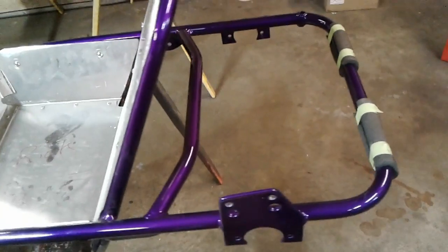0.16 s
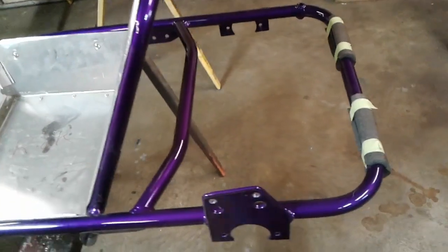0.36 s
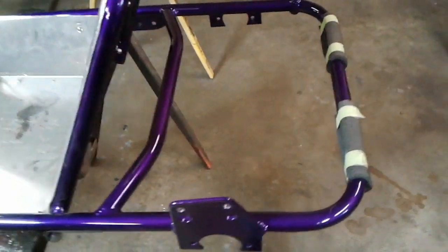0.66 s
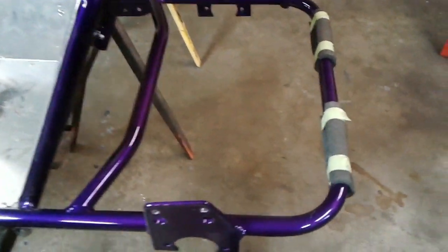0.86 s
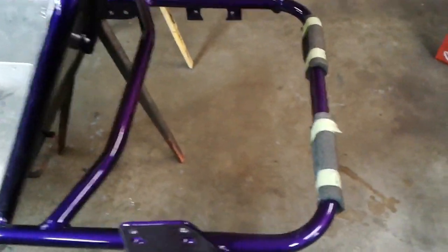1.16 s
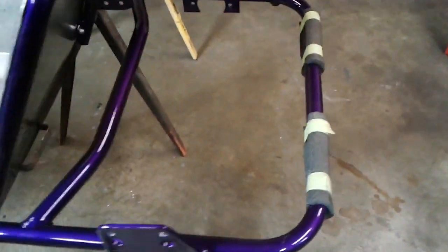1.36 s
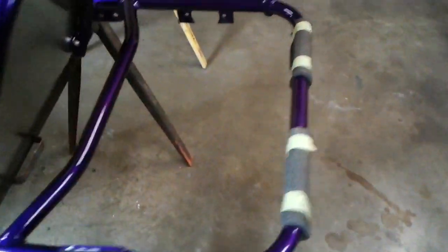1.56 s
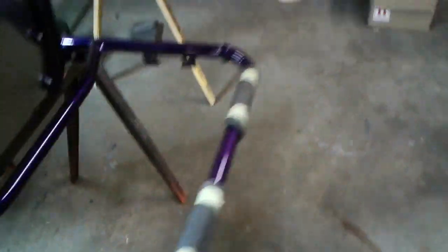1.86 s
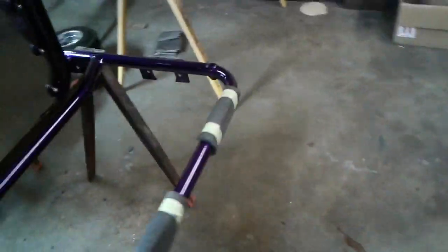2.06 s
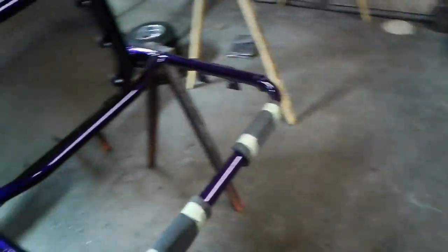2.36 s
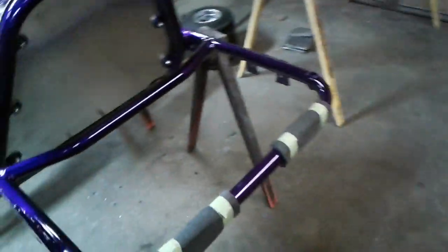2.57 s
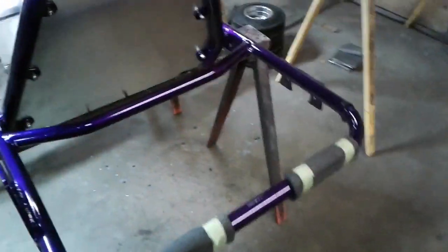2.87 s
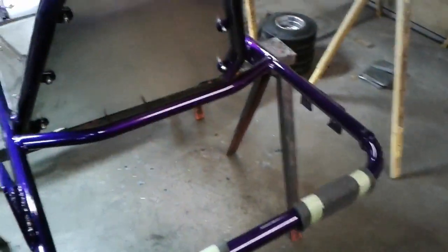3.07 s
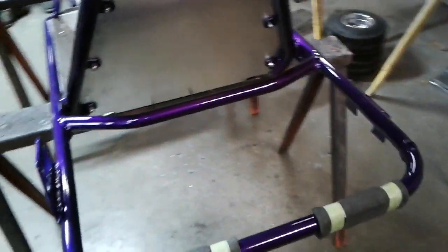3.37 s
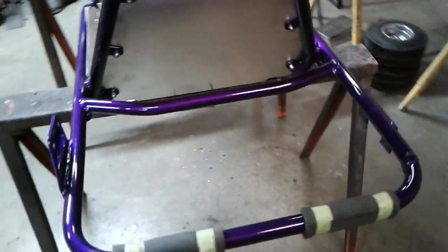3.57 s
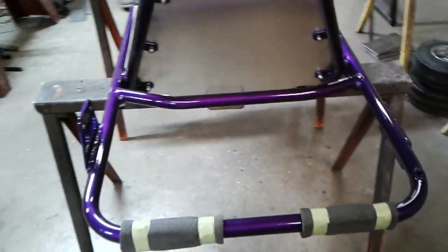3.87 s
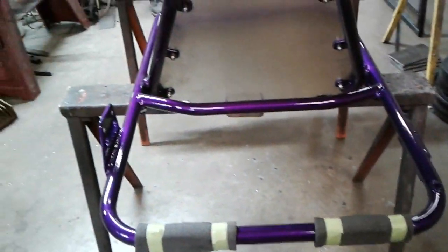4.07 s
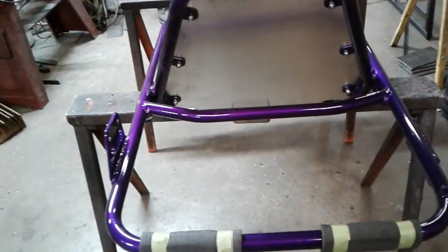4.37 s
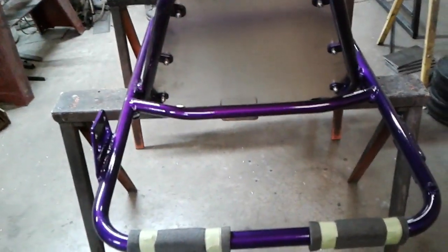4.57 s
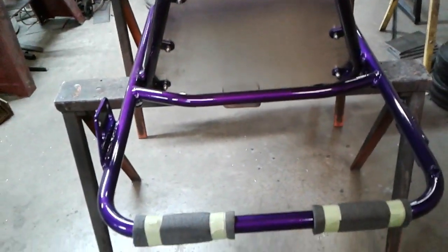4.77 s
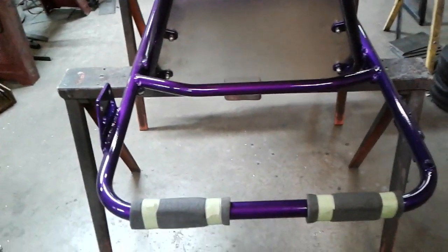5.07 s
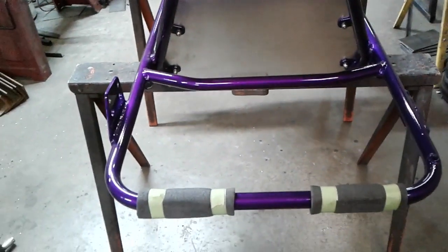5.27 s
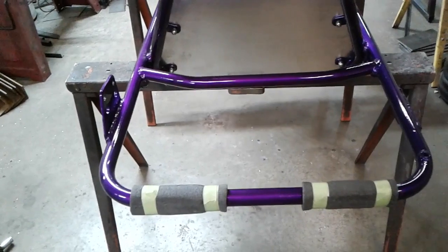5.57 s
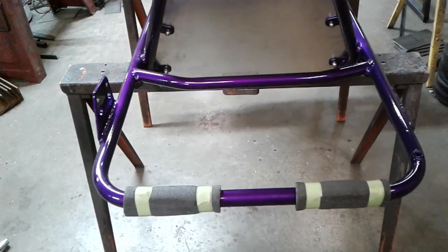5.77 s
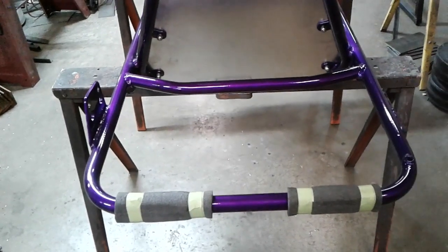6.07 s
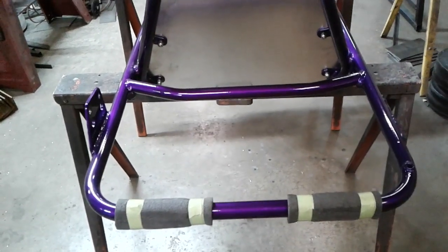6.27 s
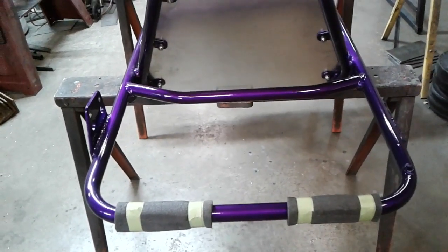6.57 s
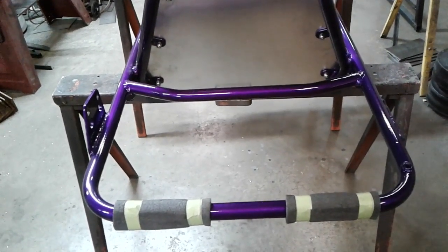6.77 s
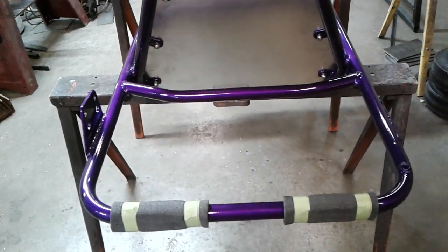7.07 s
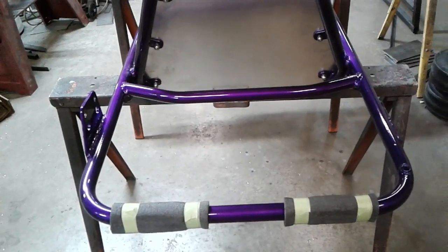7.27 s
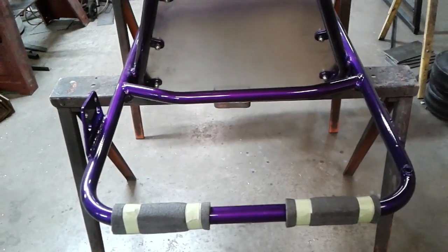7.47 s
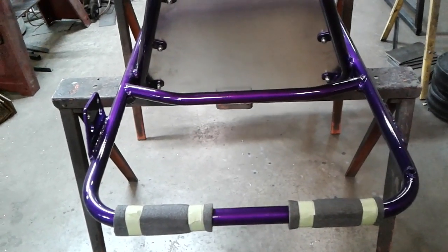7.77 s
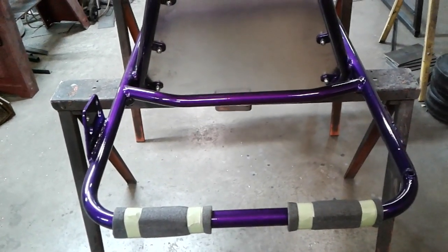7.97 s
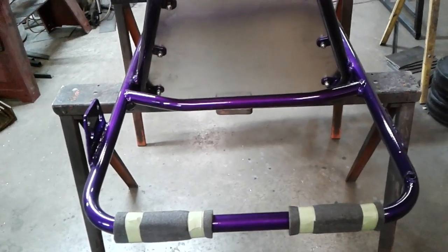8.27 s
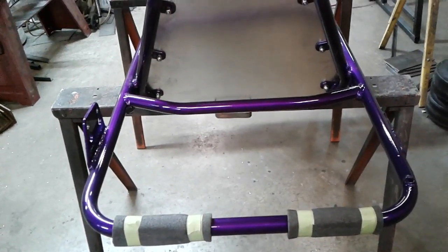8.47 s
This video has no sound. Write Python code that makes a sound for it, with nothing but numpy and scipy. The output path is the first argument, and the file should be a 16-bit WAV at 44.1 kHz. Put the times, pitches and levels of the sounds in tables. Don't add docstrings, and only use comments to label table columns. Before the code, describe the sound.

Deep mains-like hum grows louder indoors while soles scrape grit, tiny handling ticks snap and one dull thud lands near five seconds.

```python
import sys
import numpy as np
from scipy import signal
from scipy.fft import rfft, irfft, next_fast_len
from scipy.io import wavfile
from scipy.ndimage import uniform_filter1d

SR = 44100
rng = np.random.default_rng(int(sys.argv[2]) if len(sys.argv) > 2 else 0)


def boost(x):
    u = np.asarray(x, float) / 20
    return 10 ** u


def int16_out(signal):
    q = np.round(np.clip(np.atleast_2d(signal).T, -1, 1) * 32767)
    wavfile.write(sys.argv[1], SR, q.astype(np.int16))


N = 380583
T = np.arange(N) / SR

CORE_HZ, SHAFT_HZ, BUZZ_HZ, CLOCK_HZ, WHINE_HZ = 119.99, 29.955, 60.42, 1000, 1340.5
BELT_HZ, HUNT_HZ = 11.6, 12
LOUD_ORDER = 36
SOUND_M_PER_S = 343
AIR_DB, ROOM_RIPPLE_DB = -42.5, 2.4
SCUFF_DROP_DB, SCUFF_ROUND = 14, 1.52
FLUTTER_DB = 1.8
FINE_DB, DUST_DB, DUST_FOLLOWS = -12, -5.5, 1.3
LONG_DRAG_S = 0.17
SHORT_END, LONG_END = 1, 1.08

# time in seconds, share of the way from first to last standpoint (0-1).
WALK_SHARE = [(0, 0.5), (.7, 0), (1.3, 0.1), (2, 0.8), (2.7, 0.5), (3.5, 0.94), (4.5, 1), (6, 0.9),
              (8.63, 0.85)]
# time in seconds, standpoint number (0-7).
STANDPOINT_PATH = [(.7, 0), (1, 1), (1.4, 1), (2, 2), (2.8, 3), (3.65, 4), (4.5, 5), (5.5, 6), (6.3, 7),
                   (8.63, 7)]
# time in seconds, distance from a still point of the hum in metres.
WAVE_PATH = [(0, .008), (.3, .02), (.5, .032), (.9, .076), (1.3, .118), (1.7, .165), (2.1, .215),
             (2.5, .25), (2.9, .3), (3.3, .36), (3.7, .4), (4.1, .49), (4.3, .44), (4.9, .48), (5.7, .43),
             (6.6, .495), (8.15, .45), (8.63, .5)]

# level at the wave's loudest spot in dB, level of the scattered sound in dB.
CORE_LEVELS = (-23.3, -62)
# time in seconds, 2nd harmonic in dB, 3rd harmonic in dB.
CORE_OVERTONES = [(0, -44, -48), (.2, -42.5, -47), (.45, -46, -49), (.85, -43, -46.5), (1.15, -48, -47),
                  (1.4, -45, -44.5), (1.7, -49, -40.5), (2, -56, -38), (2.2, -56, -38.5), (2.5, -55, -42.5),
                  (2.75, -54, -40), (3.15, -53, -40.5), (3.6, -49, -39), (3.9, -46, -42),
                  (4.9, -45.5, -39.5), (5.2, -45.5, -41), (6.2, -45.5, -40.5), (8.63, -46, -42)]
# multiple of the shaft speed, then level in dB at each of eight standpoints.
SHAFT_ORDERS = [(5, -59, -54, -57, -57, -62, -68, -66, -65), (9, -56, -56, -56, -51, -49, -52, -50, -50),
                (10, -53, -55, -61, -56, -56, -56, -57, -58), (13, -68, -61, -60, -56, -54, -52, -53, -55),
                (14, -56, -48, -53, -55, -52, -52, -55, -54), (16, -52, -51, -51, -72, -56, -58, -55, -55),
                (17, -53, -60, -58, -55, -52, -57, -54, -51), (19, -68, -69, -65, -59, -57, -61, -61, -60),
                (20, -58, -60, -71, -55, -53, -53, -55, -55), (24, -57, -56, -57, -58, -60, -59, -58, -61),
                (28, -77, -67, -68, -64, -59, -61, -59, -58), (32, -65, -68, -67, -71, -66, -75, -70, -69)]
# multiple of its speed, then level in dB at each of eight standpoints.
BUZZ_ORDERS = [(26, -66, -78, -68, -67, -72, -71, -69, -63), (27, -68, -66, -68, -69, -66, -62, -62, -63),
               (28, -62, -71, -72, -73, -72, -71, -69, -73), (30, -65, -79, -70, -75, -72, -77, -74, -68),
               (31, -75, -72, -65, -73, -65, -65, -64, -68), (32, -69, -64, -75, -70, -61, -67, -67, -61),
               (33, -70, -67, -61, -57, -62, -64, -63, -63), (34, -57, -66, -68, -70, -66, -62, -58, -61),
               (35, -71, -76, -64, -60, -60, -60, -60, -63), (37, -77, -78, -66, -62, -59, -63, -65, -65),
               (38, -63, -60, -77, -65, -63, -69, -72, -76)]
# multiple of its speed, then level in dB at each of eight standpoints.
HIGH_BUZZ_ORDERS = [(54, -78, -78, -73, -71, -69, -77, -78, -73),
                    (56, -72, -71, -70, -80, -72, -80, -68, -71),
                    (58, -70, -72, -72, -71, -76, -69, -72, -73),
                    (60, -78, -67, -71, -66, -75, -69, -73, -76),
                    (64, -76, -75, -72, -70, -66, -77, -76, -79),
                    (66, -72, -69, -71, -76, -69, -72, -71, -71),
                    (68, -71, -65, -68, -71, -67, -72, -71, -71),
                    (70, -65, -66, -72, -67, -63, -73, -73, -68),
                    (72, -69, -70, -70, -70, -65, -71, -68, -69),
                    (74, -70, -75, -75, -70, -73, -73, -75, -70),
                    (76, -75, -77, -75, -75, -72, -69, -74, -73),
                    (92, -86, -88, -80, -87, -77, -81, -83, -84)]
# time in seconds, level in dB.
BUZZ_TURNING = [(0, -1), (.7, 0), (1, -1), (2.4, -1), (2.65, -3), (2.9, -1), (8.63, -1)]
# time in seconds, level in dB.
LOUD_BUZZ_FADES = [(0, -51), (.25, -53), (.45, -59), (.65, -54), (.9, -65), (1.7, -71), (1.9, -59),
                   (2.3, -57), (2.7, -69), (3.5, -63), (3.9, -57), (4.25, -65), (4.85, -55), (5.3, -67),
                   (5.9, -58), (7.2, -67), (7.7, -58), (8.1, -63), (8.63, -57)]
# pitch in Hz,
# then level in dB at each of eight standpoints.
PANEL_TONES = [(161, -56, -54, -52, -55, -55, -58, -62, -58),
               (180.2, -67, -59, -55, -53, -56, -55, -52, -53),
               (228, -66, -70, -64, -55, -56, -58, -58, -59),
               (330.5, -56, -54, -55, -56, -58, -54, -57, -57),
               (450.5, -53, -64, -57, -58, -58, -61, -62, -62),
               (540, -75, -70, -66, -74, -72, -73, -73, -65), (592, -68, -74, -63, -57, -56, -56, -59, -59),
               (660, -67, -66, -73, -65, -68, -66, -69, -70), (690, -74, -69, -76, -67, -78, -68, -67, -67),
               (797, -68, -77, -68, -72, -70, -73, -64, -62), (622, -70, -70, -68, -68, -67, -66, -64, -64),
               (866, -63, -70, -70, -66, -63, -62, -64, -66), (967, -66, -69, -68, -72, -68, -74, -70, -67),
               (1259, -76, -76, -74, -72, -72, -70, -68, -67),
               (1510, -74, -74, -72, -70, -70, -68, -66, -70),
               (2356, -78, -78, -76, -74, -74, -74, -72, -73),
               (5666, -88, -94, -93, -87, -91, -87, -79, -79)]
# time in seconds, level in dB.
WHINE_FADES = [(0, -74), (.5, -74), (.7, -63), (1.5, -62), (1.7, -56), (1.95, -59), (2.3, -54.5),
               (2.5, -57), (2.7, -68), (3.1, -55), (3.35, -55.5), (3.6, -60), (4.1, -54.5), (5.3, -53),
               (6.3, -55.5), (7.5, -53.5), (8.3, -54), (8.63, -57)]
# frequency in Hz, level in dB per Hz at the first standpoint, at the last.
AIR_SPECTRUM = [(19.8, -27.5, -30), (45, -20, -15.5), (63.7, -17, -22), (98, 0, 1), (171, -0.5, -2),
                (250, -6, -1), (418, -3, -4), (827, -13, -7.5), (1050, -14.5, -13), (2200, -17, -14),
                (2690, -22, -22), (4780, -35, -29), (6200, -50, -34.5), (15900, -34, -39)]

# multiple of the clock pitch, level in dB.
CLOCK_TONES = [(6, -101), (7, -100), (8, -92), (9, -86), (10, -102), (12, -120), (13, -86), (14, -91),
               (15, -100)]
# on in seconds, off in seconds.
CLOCK_TIMES = [(0, 1.5), (1.72, 2.58), (2.72, 5.8), (5.86, 5.91), (6.71, 7.52), (7.56, 7.6), (7.64, 7.67),
               (7.74, 8.01), (8.04, 8.07), (8.12, 8.15)]
# frequency in Hz, gain in dB.
MIC_RESPONSE = [(4700, 0), (5200, -4), (6000, -3), (6800, -9.5), (7800, 0), (9400, 5.5), (10000, -7),
                (10800, -11.5), (11700, -22), (12700, -16), (13500, -11), (15500, -8)]

# frequency in Hz, level in dB.
COARSE_SPECTRUM = [(700, -33.5), (1250, -7), (1600, -7), (2200, -5), (2900, -6), (3600, -6.5), (5700, -17),
                   (8000, -22.5)]
# frequency in Hz, level in dB.
FINE_SPECTRUM = [(4000, -29), (6500, -7.5), (7700, -3), (9000, -1), (11000, -12), (12500, -18.5)]
# frequency in Hz, level in dB.
DUST_SPECTRUM = [(10500, -26), (12500, -1), (14000, -7), (16000, -2.5)]
# time in seconds, effort in dB, brightness in dB.
RUSTLE_EFFORT = [(0, -55.5, 0), (.4, -55, -4.5), (.8, -61.5, 6.5), (1.3, -54, 1), (1.8, -55, -3.5),
                 (2.2, -52, -1), (2.52, -63, 10), (2.65, -65, 2), (2.74, -50, -4), (3.2, -56, 1.5),
                 (3.65, -54.5, -8), (4.05, -57, 3), (4.35, -55, 5), (4.7, -63, 9), (5.15, -59.5, 0),
                 (5.6, -71, 1), (6, -74.5, -3), (8.63, -68, -3)]
# peak time, rise and fall in seconds, peak level in dB, brightness in dB.
SCUFF_EVENTS = [(.19, .14, 0.077, -59, 10), (.65, 0.04, 0.046, -52, -9), (.96, 0.032, 0.21, -54, 1),
                (1.22, 0.11, 0.038, -51, -8), (1.42, 0.1, .08, -56, 0), (1.55, .04, .04, -61, 1),
                (2.03, 0.14, 0.17, -51, 1), (2.29, 0.11, 0.24, -46.5, 1), (3.08, 0.16, 0.21, -49, 0),
                (3.275, 0.033, 0.097, -52, 6), (3.455, 0.015, 0.05, -53, 10),
                (3.513, .025, 0.071, -43, 1.5), (3.765, 0.048, 0.21, -44, -2.5),
                (4.136, 0.0098, 0.077, -43, .6), (4.83, 0.046, 0.13, -44, 1), (4.92, 0.12, 0.13, -44, 2.5),
                (5.766, .13, .18, -55.5, -11), (6.214, 0.17, 0.17, -54.5, -5), (6.39, .02, 0.14, -59, 11),
                (6.67, 0.088, .08, -60, -2), (6.93, .08, .05, -66, 6), (7.69, .05, .04, -59, -14),
                (8.09, 0.045, .08, -68, 14), (8.35, .02, .04, -56, -5)]
# start in seconds,
# length in seconds, pitch in Hz, width in Hz, level in dB.
SOLE_RINGS = [(.63, .06, 5300, 900, -62), (3.441, .04, 9200, 500, -56), (3.443, .02, 14600, 2000, -54),
              (3.486, .075, 1880, 200, -44), (3.502, .031, 3720, 200, -51), (3.5, .05, 2430, 250, -55),
              (3.75, .11, 2270, 120, -47), (3.75, .06, 3890, 100, -52), (3.806, .12, 2470, 250, -56),
              (4.127, .047, 2010, 150, -44), (4.123, .05, 2450, 150, -42), (4.12, .079, 1710, 50, -48),
              (4.8, .07, 3360, 120, -50), (4.837, .13, 3000, 700, -51), (4.78, .2, 1640, 260, -46.5),
              (4.799, .21, 1960, 400, -45.5), (4.8, .18, 5500, 1200, -47.5), (5.698, .15, 3400, 500, -58),
              (3.49, .06, 6200, 1500, -53), (3.46, .14, 13800, 2500, -52.5), (3.71, .13, 1900, 500, -49),
              (4.12, .04, 6200, 1500, -56), (4.79, .1, 6200, 1500, -55), (4.775, .06, 1500, 400, -48),
              (3.73, .16, 5250, 400, -56), (3.78, .09, 4550, 150, -57), (3.84, .1, 2150, 120, -53),
              (6.19, .06, 5450, 350, -63), (6.36, .12, 14800, 1500, -60), (1.37, .07, 3100, 300, -56),
              (.48, .16, 720, 25, -53), (1.8, .16, 720, 25, -55), (5.72, .12, 5400, 300, -68)]

# start in seconds, peak in dB, time to fall 60 dB in seconds, lowest frequency in Hz.
JOINT_TICKS = [
    (0.188, -52, 0.005, 8000),
    (1.3136, -47, 0.005, 8000),
    (1.5519, -52, 0.005, 8000),
    (2.0256, -45, 0.005, 8000),
    (2.2238, -56, .005, 6000),
    (2.7601, -53, 0.005, 8000),
    (3.259, -44, 0.005, 8000),
    (6.3789, -56, .008, 8000),
    (3.4420, -31, 0.006, 8000),
]
# frequency in Hz, gain in dB.
TICK_RESPONSE = [(6000, -6), (8500, 3), (10500, 2), (11600, -4), (12500, -12), (13500, -3), (15000, -1),
                 (16000, -4), (16600, -20)]
# start in seconds, level in dB, pitch in Hz, time to fall 60 dB in seconds.
STEP_THUDS = [
    (1.95, -40, 60, .15),
    (3.46, -48, 49, .1),
    (4.966, -35, 190, 0.3),
    (4.998, -27, 340, 0.044),
    (4.9621, -17, 220, 0.03),
]
# time in seconds, pitch in Hz, level in dB.
RUBBER_SQUEAKS = [
    [(6.06, 9800, -90), (6.09, 10700, -84), (6.12, 11400, -92)],
    [(6.13, 12500, -93), (6.17, 12900, -86), (6.23, 13100, -90)],
    [(6.14, 13600, -90), (6.18, 14100, -84), (6.26, 14400, -90), (6.33, 13800, -86)],
    [(6.13, 14900, -86), (6.17, 15500, -81), (6.22, 15300, -90), (6.26, 15700, -76), (6.33, 15000, -83)],
]


def evened(x):
    return x / np.sqrt(np.mean(x ** 2) + 1e-20)


def read(points, hz, column=1):
    rows = np.transpose(points)
    return np.interp(np.log(hz + 1), np.log(rows[0] + 1), rows[column])


def curve(rows):
    s, *columns = np.transpose(rows)
    return [np.interp(T, s, c) for c in columns]


def drift(top_hz):
    t = T[::256]
    hz = np.geomspace(top_hz / 20, top_hz, num=16)[:, None]
    waves = np.sin(2 * np.pi * (hz * t + rng.random(hz.shape)))
    slow = (waves / np.sqrt(hz)).sum(0)
    return np.interp(T, t, evened(slow))


def coloured(x, points):
    size = next_fast_len(N)
    gain = boost(read(points, np.fft.rfftfreq(size, 1 / SR)))
    return irfft(rfft(x, size) * gain, size)[:N]


def tone(turns, db):
    return np.sqrt(2) * boost(db) * np.cos(2 * np.pi * turns)


def gated(active, samples):
    return uniform_filter1d(active, size=samples)


def core():
    crest_db, scattered_db = CORE_LEVELS
    turns = CORE_HZ * T + 0.0017 * drift(30)
    metres = curve(WAVE_PATH)[0]
    wave = boost(crest_db) * np.sin(2 * np.pi * CORE_HZ * metres / SOUND_M_PER_S)
    hum_db = 10 * np.log10(wave ** 2 + boost(2 * scattered_db))
    out = np.zeros(N)
    for k, db in enumerate([hum_db, *curve(CORE_OVERTONES)]):
        tremble_db = (0.17 + 0.11 * k) * drift(40)
        out += tone((k + 1) * turns - 0.12 * k, db + tremble_db)
    return out


def orders(rows, turns, place, fade_db, fade_hz, spread, slip, shift=0):
    out = np.zeros(N)
    for k, *standpoint_db in rows:
        phase = k * turns + shift + spread * rng.random() + slip * drift(fade_hz)
        db = np.interp(place, range(len(standpoint_db)), standpoint_db)
        out += tone(phase, db + fade_db * drift(fade_hz))
    return out


def machines():
    place = curve(STANDPOINT_PATH)[0]
    shaft_turns = SHAFT_HZ * T + 0.0007 * drift(4)
    shaft = orders(SHAFT_ORDERS, shaft_turns, place, 1.6, 20, spread=0.6, slip=0.015)

    belt = 2 * np.pi * (BELT_HZ * T + 0.12 * drift(3))
    turns = BUZZ_HZ * T + 0.0005 * drift(8)
    wobbled = turns + 0.0029 * np.sin(belt)
    buzz = orders(BUZZ_ORDERS, wobbled, place, 1.8, 16, spread=1, slip=0.03)
    hunt = np.cumsum(HUNT_HZ * np.tanh(2.5 * drift(5))) / SR
    high_turns = turns + 0.001 * np.sin(belt)
    high = boost(0.8) * orders(HIGH_BUZZ_ORDERS, high_turns, place, 2, 20, spread=1, slip=0.05, shift=hunt)
    loud_turns = LOUD_ORDER * wobbled + rng.random() + 0.03 * drift(30)
    loud = tone(loud_turns, curve(LOUD_BUZZ_FADES)[0] + 2.2 * drift(20))

    panels = orders(PANEL_TONES, T + 0.00009 * drift(14), place, 2, 24, spread=1, slip=0.045)
    whine_turns = WHINE_HZ * T + rng.random() + 0.06 * drift(30)
    whine = tone(whine_turns, curve(WHINE_FADES)[0] - 0.7 + 2 * drift(30))
    turning = boost(curve(BUZZ_TURNING)[0])
    return boost(-0.8) * shaft + turning * (buzz + high) + loud + boost(0.54) * panels + whine


def air(walk):
    frames, hz = N // 512 + 5, np.fft.rfftfreq(2048, 1 / SR)
    a, b, patches = rng.standard_normal((3, len(hz), frames))
    patches = uniform_filter1d(patches, size=16, axis=0)
    patches = evened(uniform_filter1d(patches, size=8, axis=1))
    share = np.interp(np.arange(frames) * 512, np.arange(N), walk)
    first = read(AIR_SPECTRUM, hz)[:, None]
    last = read(AIR_SPECTRUM, hz, 2)[:, None]
    z = (a + 1j * b) * boost(first + (last - first) * share + 0.94 * patches)
    noise = signal.istft(z, nperseg=2048, noverlap=1536)[1][:N]
    return boost(AIR_DB) * evened(noise)


def room(x):
    hz, t, z = signal.stft(x, SR, nperseg=8192)
    count = len(STANDPOINT_PATH)
    ripple = evened(uniform_filter1d(rng.standard_normal((len(hz), count)), size=3, axis=0))
    place = np.interp(t, *np.transpose(STANDPOINT_PATH))
    near = np.clip(1 - abs(place - np.arange(count)[:, None]), 0, 1)
    field = ripple @ (near / np.linalg.norm(near, axis=0))
    reach = 1 / (1 + (hz / 3000) ** 2) * (hz > 200)
    gain = boost(ROOM_RIPPLE_DB * reach[:, None] * (field - 0.3))
    return signal.istft(z * gain, SR, nperseg=8192)[1][:N]


def clock():
    active = sum(1. * (T >= on) * (T < off) for on, off in CLOCK_TIMES)
    whine = sum(tone(k * CLOCK_HZ * T + rng.random(), db + 1.3 * drift(20)) for k, db in CLOCK_TONES)
    return 0.92 * gated(active, 400) * whine


def rubbing(follows):
    effort_db, bright_db = curve(RUSTLE_EFFORT)
    power = boost(2 * (effort_db + follows * bright_db + FLUTTER_DB * drift(10)))
    for s, rise, fall, db, bright in SCUFF_EVENTS:
        near = slice(max(round((s - 3 * rise) * SR), 0), round((s + 3 * fall) * SR))
        away = np.maximum((s - T[near]) / rise, (T[near] - s) / fall)
        power[near] += boost(2 * (db + follows * bright - SCUFF_DROP_DB * away ** SCUFF_ROUND))
    return np.sqrt(power)


def grit(points, per_s, spread_db):
    size_db = spread_db * np.minimum(rng.exponential(1, N), 4)
    grains = boost(size_db) * rng.standard_normal(N)
    struck = rng.random(N) < per_s / SR
    return evened(coloured(grains * struck, points))


def resonate(x, hz, width):
    turn = np.exp(2j * np.pi * np.cumsum(hz) / SR)
    r = np.exp(-np.pi * width / SR)
    return 2 * (turn * signal.lfilter([1 - r], [1, -r], x / turn)).real


def scuffs():
    out = rubbing(0) * boost(1.5) * grit(COARSE_SPECTRUM, per_s=20000, spread_db=2.5)
    out += rubbing(0.97) * boost(FINE_DB) * grit(FINE_SPECTRUM, per_s=13000, spread_db=1.5)
    out += rubbing(DUST_FOLLOWS) * boost(DUST_DB) * grit(DUST_SPECTRUM, per_s=15000, spread_db=3.0)
    for s, length, start_hz, width_hz, db in SOLE_RINGS:
        drive = rng.standard_normal(round(length * SR))
        end = LONG_END if length > LONG_DRAG_S else SHORT_END
        hz = start_hz * np.linspace(1, end, len(drive))
        ring = resonate(drive, hz, width_hz)
        ring = evened(resonate(ring, hz, 3.5 * width_hz))
        out[round(s * SR):][:len(hz)] += boost(db) * ring * signal.windows.tukey(len(hz), 0.7)
    return out


def ticks(rows):
    out, t = np.zeros(N), T[:1500]
    for s, db, t60, low_hz in rows:
        crack = 0.44 * rng.standard_normal(len(t)) * boost(-60 * t / t60)
        crack[0] += 1.3
        band = signal.butter(2, [low_hz, 16300], "band", fs=SR, output="sos")
        out[round(s * SR):][:len(t)] += boost(db + 7.5) * signal.sosfilt(band, crack)
    return coloured(out, TICK_RESPONSE)


def knocks():
    out, t = np.zeros(N), T[:9000]
    for s, db, hz, t60 in STEP_THUDS:
        swell = (1 - np.exp(-t / 0.001)) * boost(db - 60 * t / t60)
        low_cut = signal.butter(2, 0.55 * hz, "high", fs=SR, output="sos")
        thud = swell * np.sin(2 * np.pi * hz * t)
        out[round(s * SR):][:len(t)] += signal.sosfilt(low_cut, thud)
    return out


def squeaks():
    out = np.zeros(N)
    for rows in RUBBER_SQUEAKS:
        hz, db = curve(rows)
        active = 1. * (T > rows[0][0]) * (T < rows[-1][0])
        turns = np.cumsum(hz + 30 * drift(60)) / SR
        out += gated(active, 600) * tone(turns, db)
    return out


def scene():
    walk = np.clip(curve(WALK_SHARE)[0], 0, 1)
    noises = room(air(walk)) + scuffs() + knocks()
    return (core() + machines() + coloured(noises, MIC_RESPONSE) + squeaks())[None]


def band_limit(x):
    return signal.sosfilt(signal.butter(12, 16560, fs=SR, output="sos"), x)


def record(dry):
    edge = signal.firwin(1023, 15740, window=("kaiser", 9), fs=SR)[None]
    captured = dry + clock() + ticks(JOINT_TICKS[:-1]) - 0.0006
    limited = signal.oaconvolve(captured, edge, "same")
    return band_limit(limited + ticks(JOINT_TICKS[-1:]))


dry = scene()
out = record(dry)
int16_out(out)
```